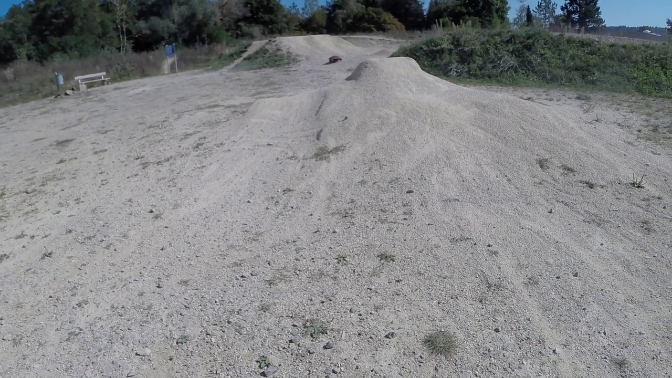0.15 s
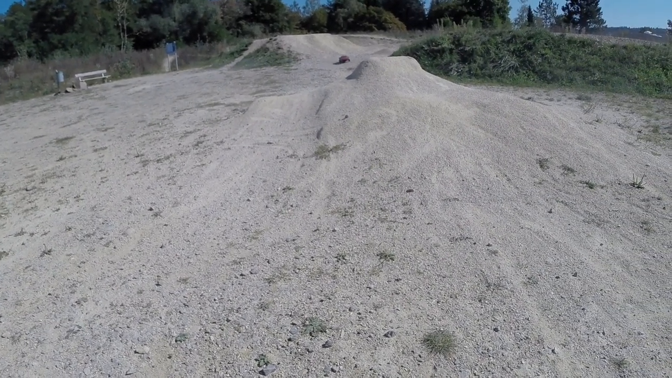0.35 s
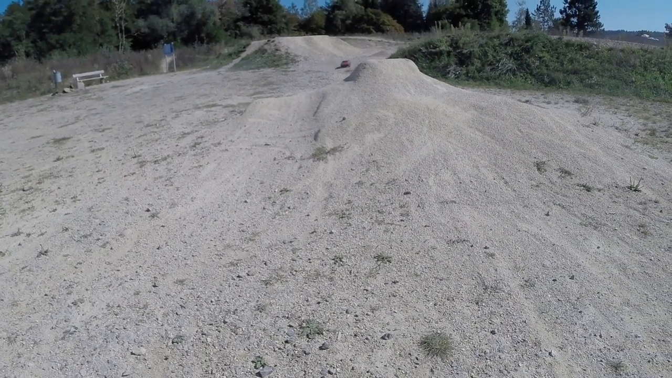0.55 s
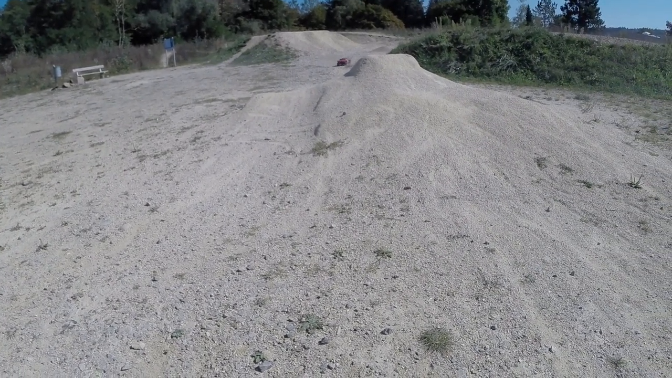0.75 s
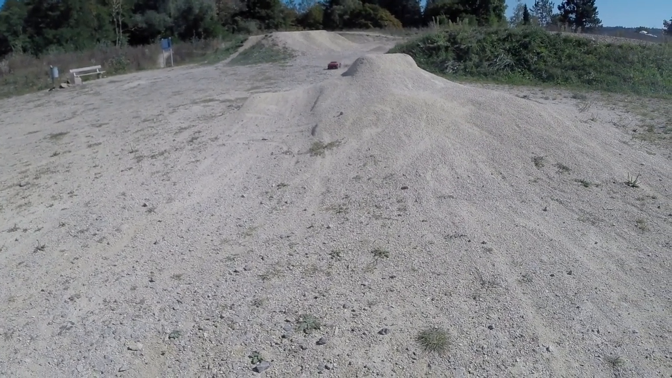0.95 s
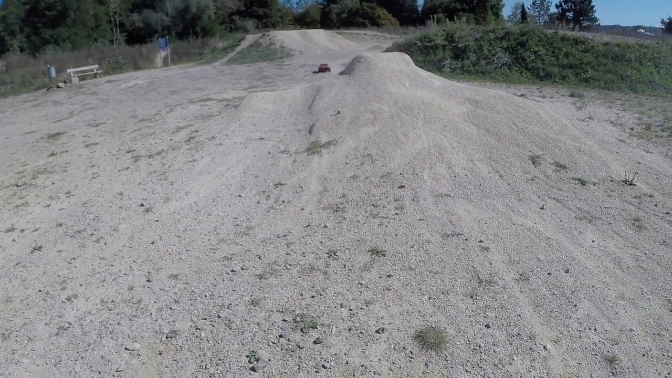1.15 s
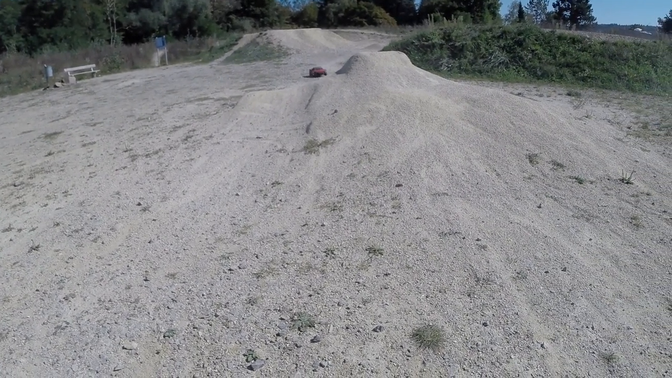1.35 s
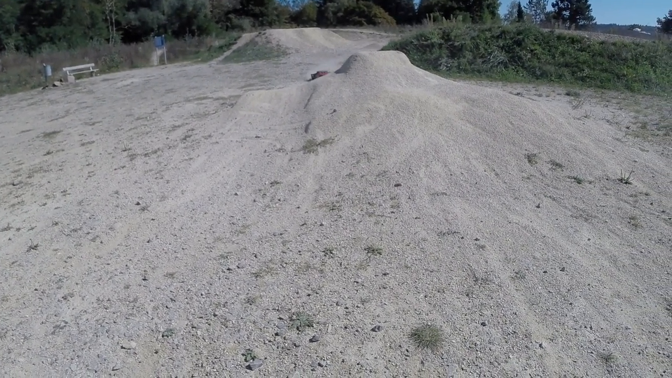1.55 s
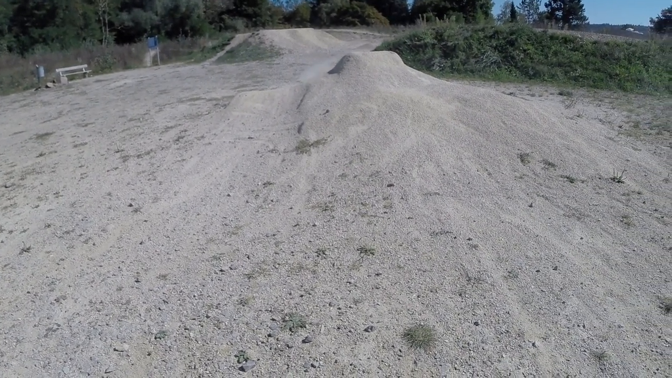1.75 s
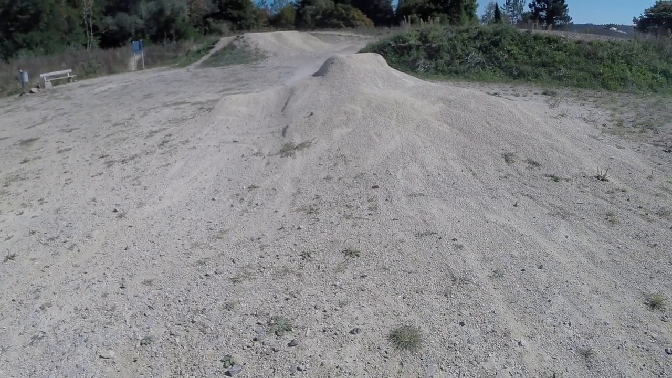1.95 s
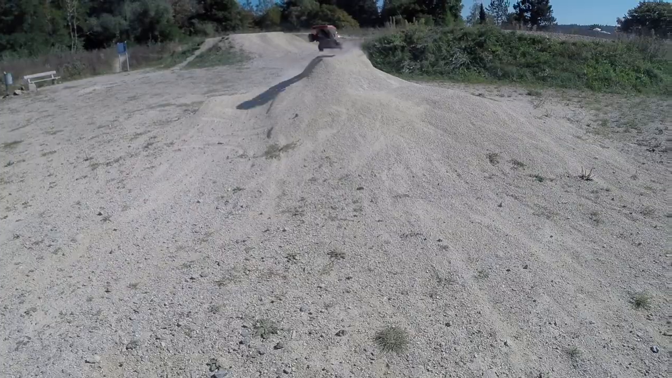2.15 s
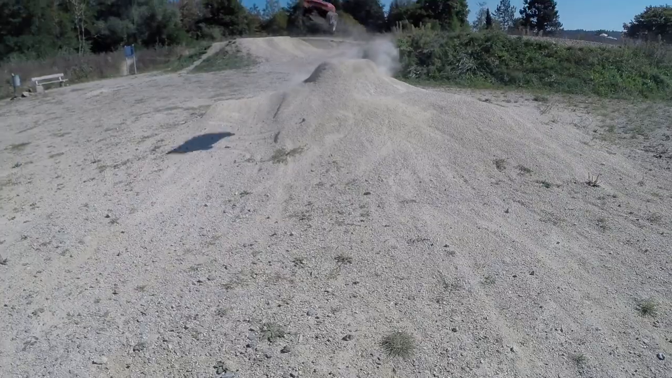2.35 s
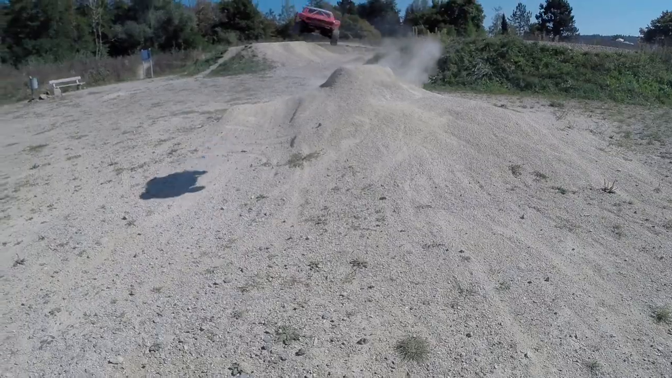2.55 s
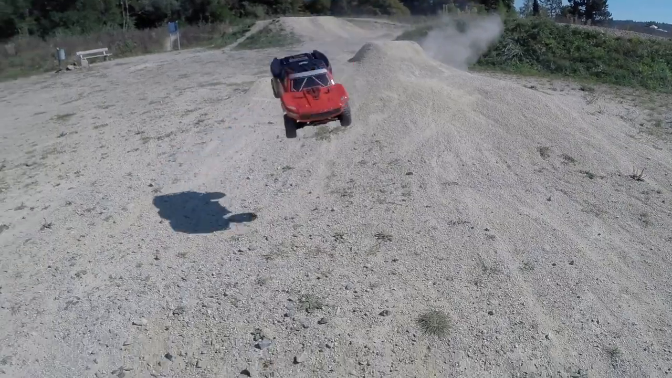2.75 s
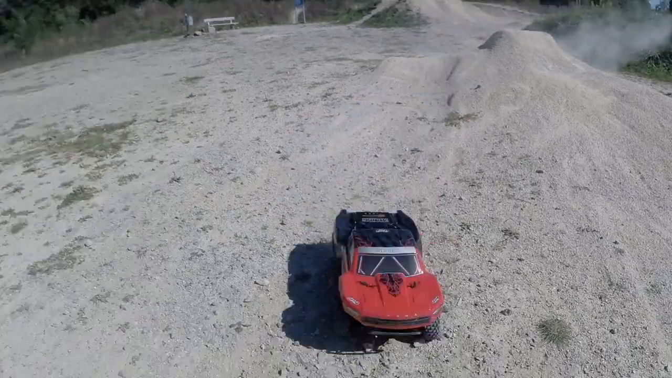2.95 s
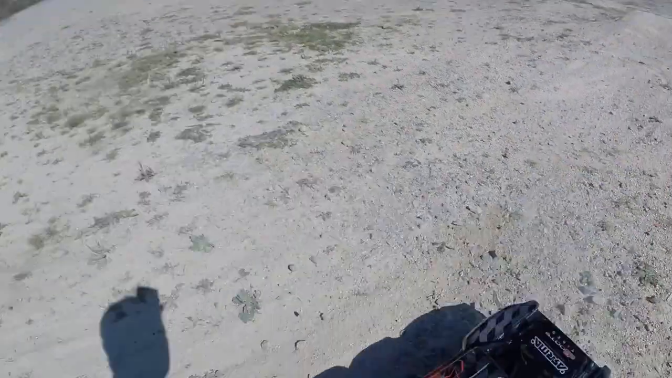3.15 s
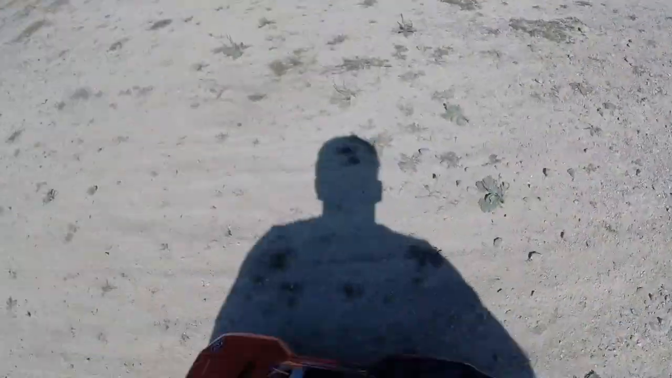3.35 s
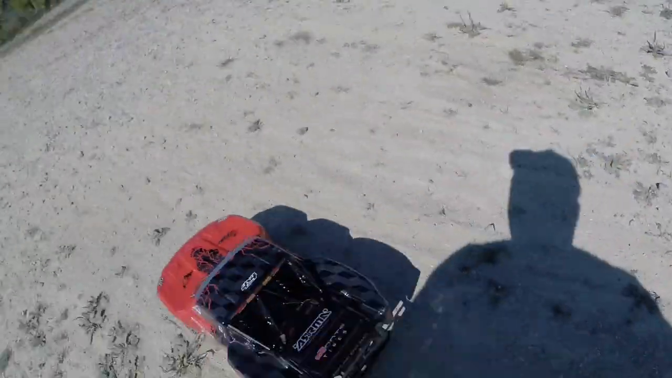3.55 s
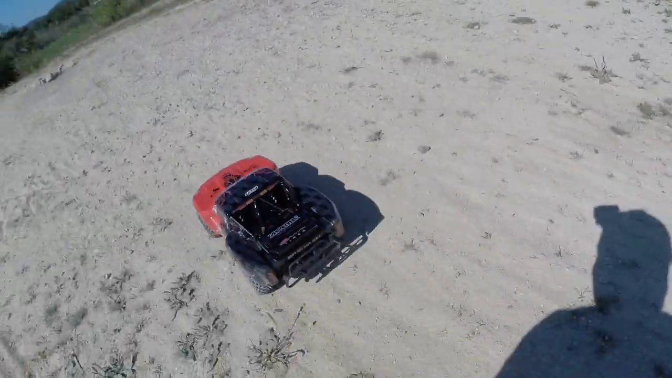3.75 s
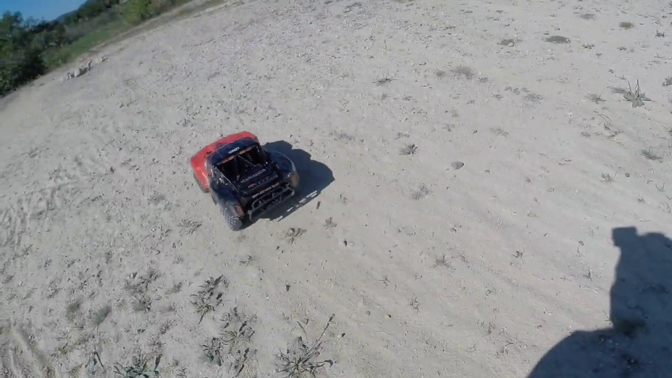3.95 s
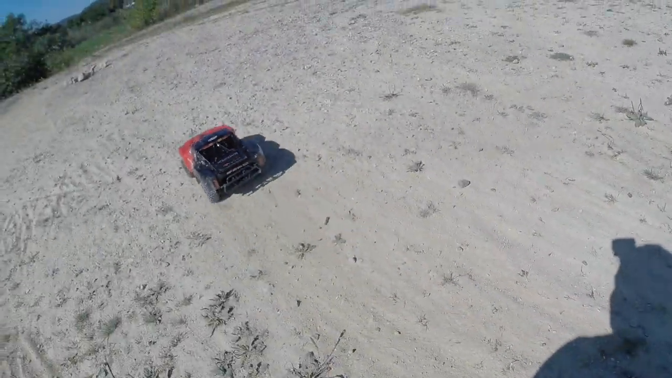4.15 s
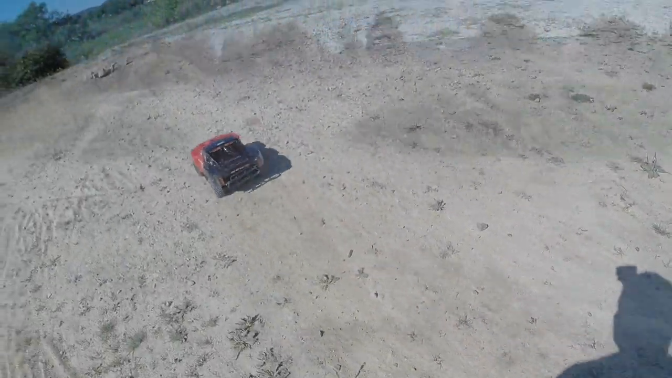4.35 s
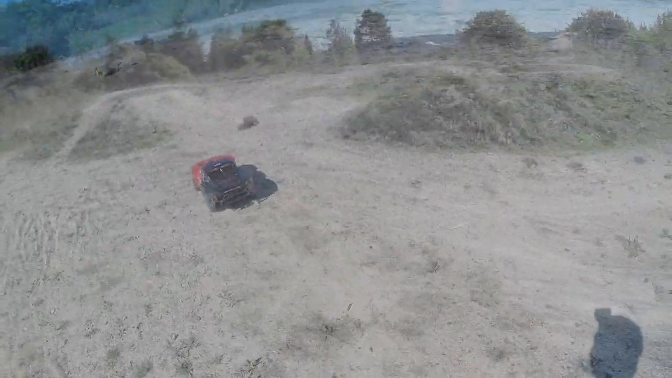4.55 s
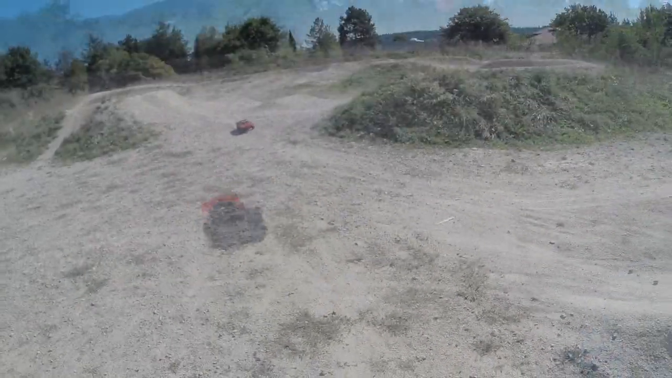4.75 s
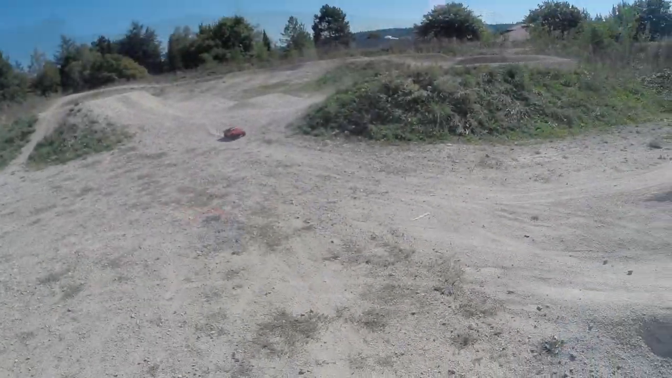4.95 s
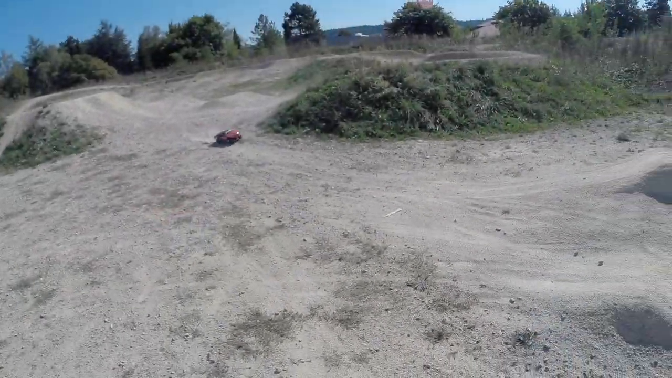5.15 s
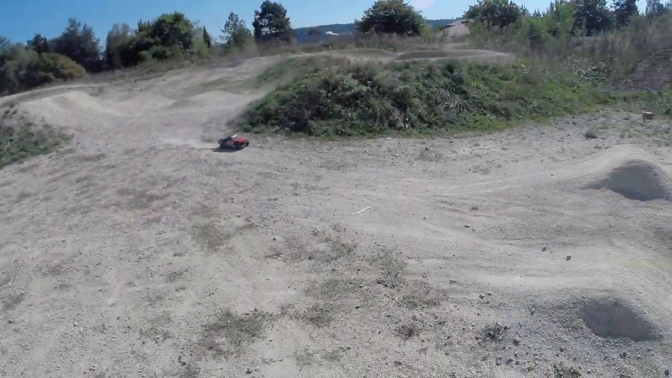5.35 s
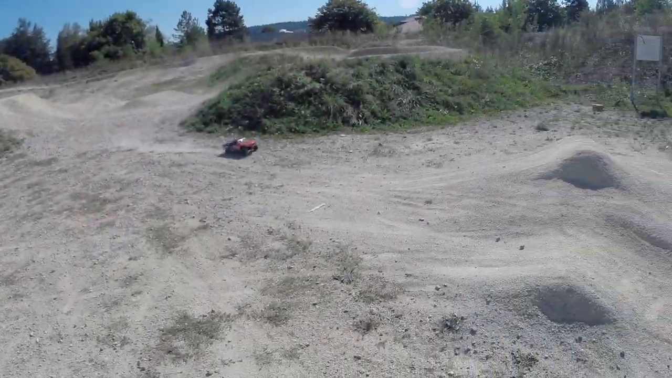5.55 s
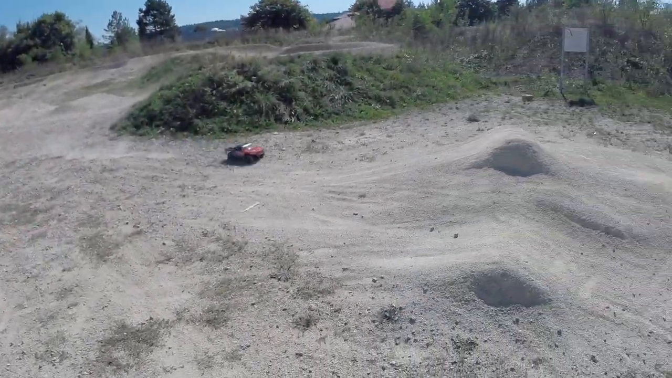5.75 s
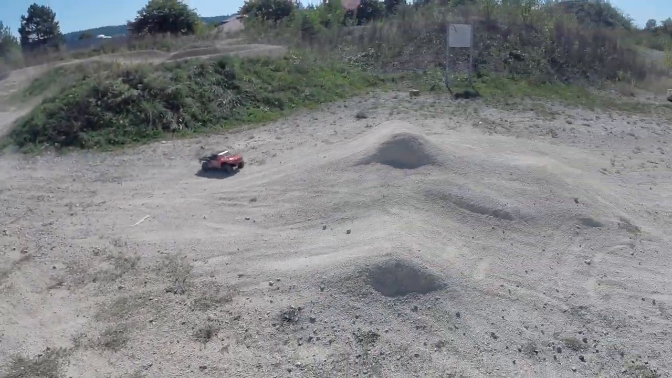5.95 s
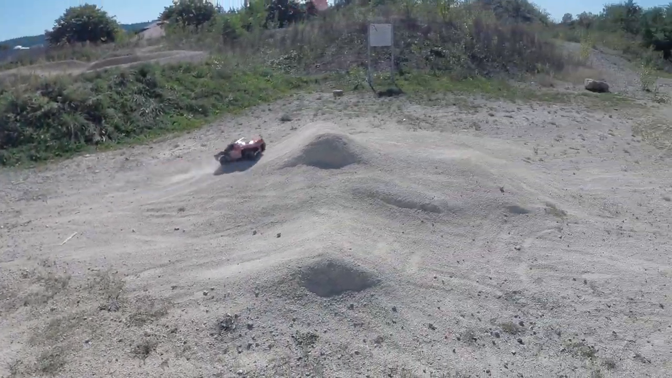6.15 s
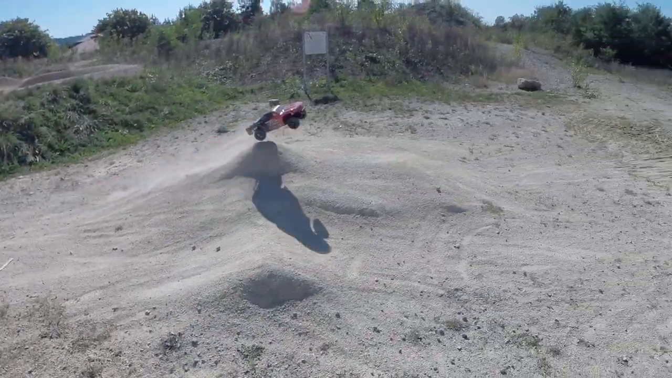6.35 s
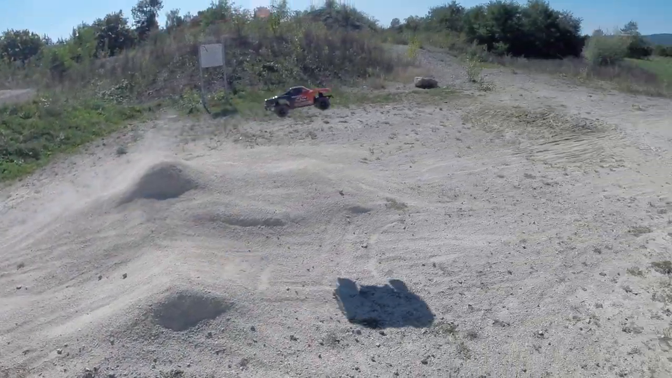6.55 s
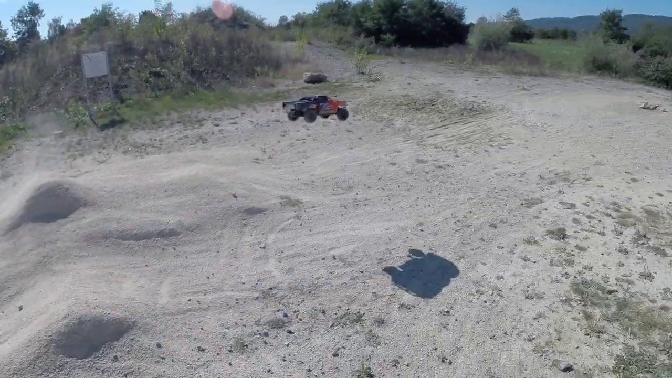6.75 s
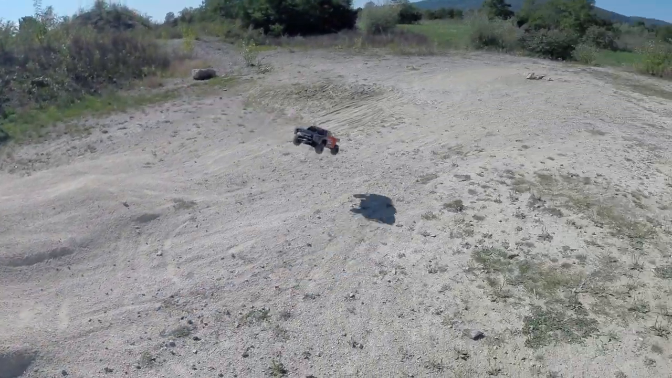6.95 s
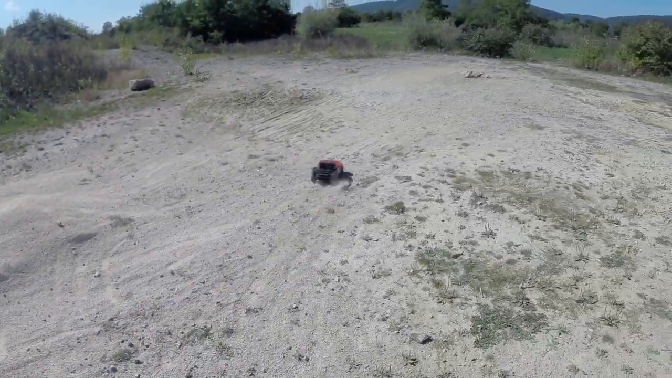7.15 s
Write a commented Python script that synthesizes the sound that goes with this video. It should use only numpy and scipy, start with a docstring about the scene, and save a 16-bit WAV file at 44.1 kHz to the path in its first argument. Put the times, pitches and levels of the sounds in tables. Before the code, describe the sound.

Faint motor whine grows over loose stones, surges in flight, slams down with a plastic clatter, then ticking roll-out, another run and jump.

```python
"""On an open-air gravel track, a small electric radio-controlled truck races, jumps, crashes down,
rolls out ticking, speeds off and jumps again, over a steady hush and wind rumbling on the microphone.
Noise makes the air and the rubber; random contacts ring shell, gearbox and stones as rasp, spray and knocks.
Sines at the gear mesh rate and its fractions whine and buzz with the motor, and sing out in the air."""
import sys
import numpy as np
from scipy import signal
from scipy.fft import rfft, irfft, next_fast_len
from scipy.io import wavfile

SR = 44100
rng = np.random.default_rng(int(sys.argv[2]) if len(sys.argv) > 2 else 0)


def wav_record(signal):
    """Record a signal, one row per channel, as 16-bit PCM in the file named by sys.argv[1]."""
    frames = np.transpose(np.atleast_2d(signal))
    bounded = np.clip(frames, -1, 1)
    # unit amplitude maps onto the largest positive 16-bit level
    quanta = np.round(bounded * 32767).astype(np.int16)
    wavfile.write(sys.argv[1], SR, quanta)


N = 317961
TIME = np.arange(N) / SR  # [s]

# resonances of the plastic shell and chassis: (frequency [Hz], width [Hz], level [dB])
SHELL = [(260, 220, -12), (359, 55, 2.5), (468, 89, 0), (624, 170, -8), (740, 82, -0.5), (910, 105, 3),
         (1146, 105, 4), (1344, 120, 5.5), (1405, 49, 0), (1870, 125, 2), (2317, 95, 10), (2486, 77, 1.5),
         (2660, 136, 4.5), (2933, 100, 10), (3145, 110, -2), (3220, 63, 4), (3760, 170, 1), (4370, 56.5, 8),
         (4460, 39, -26), (5500, 75, -35), (5900, 92, -34), (7160, 170, -33), (9400, 550, -24),
         (11800, 5100, -13.5)]
# resonances of the gearbox and its cover: (frequency [Hz], width [Hz], level [dB])
GEARBOX = [(1487, 71, -4), (1942, 46.5, -2.5), (2290, 79, -6.5), (2510, 104, 1.5), (2780, 99, -2),
           (2892, 250, 3), (3117, 310, 0), (3800, 31, -10), (4420, 73, -13), (4350, 50, 0), (5130, 57, -31)]
# resonances of ringing gravel and the motor can: (frequency [Hz], width [Hz], level [dB])
STONES = [(3000, 850, -13), (3870, 420, 0.5), (4550, 89, 1.5), (5645, 420, -2.5), (6420, 230, -9),
          (7100, 300, -9.5), (8430, 370, -17), (10100, 760, -17), (12700, 1400, -15)]


def from_db(db):
    """Decibels to gain."""
    return 10 ** (np.asarray(db) / 20)


def rms_one(x):
    """Scale to unit power."""
    return x / np.sqrt(np.mean(x ** 2) + 1e-20)


def in_time(rows):
    """Each column of a time curve, interpolated at every sample."""
    s, *columns = np.transpose(rows)
    return [np.interp(TIME, s, column) for column in columns]


def during(start, end, blend_s=0.062):
    """Rises to 1 around the start and falls back to 0 around the end."""
    return np.clip(np.minimum(TIME - start, end - TIME) / blend_s + .5, 0, 1)


def drift(corner_hz):
    """Smooth random wandering with unit spread: low-passed noise drawn at a slow rate."""
    step = 40  # samples between slow values
    r = np.exp(-2 * np.pi * corner_hz * step / SR)
    draws = rng.standard_normal(N // step + 2002)
    slow = signal.lfilter([1], [1, -2 * r, r * r], draws)[2000:]  # skip the filter's start
    return np.interp(np.arange(N) / step, np.arange(len(slow)), rms_one(slow))


def cut(x, hz, kind, order=2):
    """Butterworth low-pass or high-pass."""
    sos = signal.butter(order, min(hz, SR / 2 - 1), kind, fs=SR, output="sos")
    return signal.sosfilt(sos, x + 1e-18)


def noise(spectrum):
    """Unit-power noise coloured by a (frequency [Hz], density [dB]) curve."""
    hz, db = np.transpose(spectrum)
    size = next_fast_len(N)
    bins = np.maximum(np.fft.rfftfreq(size, 1 / SR), 1)
    gain = from_db(np.interp(np.log(bins), np.log(hz), db))
    return rms_one(irfft(rfft(rng.standard_normal(size)) * gain, size)[:N])


def resonate(x, modes):
    """Parallel resonances with notches between them; white noise keeps its power."""
    out, power = 0, 0
    for hz, width, db in modes:
        r = np.exp(-np.pi * width / SR)
        top = from_db(db) * (1 - r * r) / 2
        poles = [1, -2 * r * np.cos(2 * np.pi * hz / SR), r * r]
        out = out + signal.lfilter([top, 0, -top], poles, x + 1e-18)
        power += from_db(db) ** 2 * (1 - r)
    return out / np.sqrt(power)


def chatter():
    """Dense, even make-and-break of a hard contact: random signs."""
    return rng.choice([-1., 1.], N)


def grains(per_s, spread_db):
    """Random tiny impacts, many weak and a few strong; unit power."""
    sizes = from_db(spread_db * np.minimum(rng.exponential(1, N), 4))
    hits = rng.random(N) < per_s / SR
    return rms_one(sizes * rng.choice([-1, 1], N) * hits)


def blows(times, levels_db, t60s):
    """Force envelope that jumps at each blow and dies away, 60 dB in t60; overlaps add in power."""
    out = np.zeros(N)
    for s, db, t60 in zip(times, levels_db, t60s):
        start = int(np.clip(s * SR, 0, N - 1))
        age = TIME[:min(SR // 4, N - start)]  # at most a quarter second
        out[start:start + len(age)] += from_db(db - 60 * age / t60) ** 2
    return np.sqrt(out)


def scattered(per_s, level_db, spread_db, t60):
    """Force envelope of small blows of uneven size at random moments."""
    uneven_db = spread_db * np.clip(rng.standard_normal(N), -2, 2)
    sizes = from_db(level_db + uneven_db) * (rng.random(N) < per_s / SR)
    keep = from_db(-60 / (t60 * SR)) ** 2  # power kept per sample
    return np.sqrt(signal.lfilter([1], [1, -keep], sizes ** 2 + 1e-18))


def outdoors(sway_db=0.73):
    """Steady open-air hush that sways slightly, with wind lumping and rumbling on the microphone."""
    # spectra of the hush, deep gust lumps and rumble: (frequency [Hz], density [dB per Hz])
    air_colour = [(65, -30), (110, 1.5), (205, -2), (257, -4.5), (458, -8), (612, -9), (946, -13),
                  (1190, -16), (1760, -18), (2350, -23), (2660, -19), (3860, -26.5), (4950, -25),
                  (5840, -28), (8400, -32.5), (9400, -34), (10050, -30), (10800, -37), (15400, -34)]
    gust_colour = [(8, -6.5), (16, 11), (26, -2), (40, 5), (55, -26), (100, -16), (200, -80)]
    rumble_colour = [(30, -40), (48, -7), (68, 0.5), (85, -8), (110, -17), (170, -22), (400, -75)]
    # wind on the microphone: (time [s], deep lump level [dB], rumble level [dB])
    wind = [(0, -52.5, -55), (2.2, -52.5, -52), (2.35, -43.5, -50), (2.7, -54.5, -49.5), (2.9, -30, -48.5),
            (3.4, -36, -52), (4.15, -42.5, -49.5), (4.8, -51, -54), (5.9, -51, -51), (6.35, -47.5, -54),
            (6.7, -48.5, -46.5), (7.21, -49.5, -49)]
    lumps_db, rumble_db = in_time(wind)
    air = from_db(-54.5 + sway_db * drift(15)) * noise(air_colour)
    return air + from_db(lumps_db) * noise(gust_colour) + from_db(rumble_db) * noise(rumble_colour)


def tyres(bump_db=2, rubber_db=-0.5, shell_db=-6, shell_top_hz=1400):
    """Rubber drums over the bumpy packed dirt and shakes the shell."""
    # common level of rubber and shaken shell: (time [s], level [dB])
    rolling = [(0, -62), (2.4, -60.5), (2.62, -62), (2.94, -50.5), (3.1, -47), (3.45, -53.5), (4.1, -58.5),
               (4.55, -74), (5.1, -60), (6.2, -53.5), (6.5, -60)]
    # drumming rubber: (frequency [Hz], density [dB per Hz])
    tyre_colour = [(100, -34), (200, 3), (340, 3), (560, -3), (800, -7), (1000, -5.5), (1200, -4.5),
                   (1480, -5.5), (1700, -7), (2600, -10), (6000, -58)]
    rubber = noise(tyre_colour)
    shaken = rms_one(cut(resonate(chatter(), SHELL), shell_top_hz, "low", order=4))
    level = from_db(in_time(rolling)[0] + bump_db * drift(23))
    return level * (from_db(rubber_db) * rubber + from_db(shell_db) * shaken)


def gravel(level_db, clump_db=3.0, top_hz=11000):
    """Tyres throw clumps of small stones that click against each other and ring."""
    stones = grains(per_s=3500, spread_db=0.5) * from_db(clump_db * drift(54))
    return from_db(level_db) * rms_one(cut(resonate(stones, STONES), top_hz, "low"))


def pebbles(per_s, level_db, t60=0.0072, low_hz=2800, top_hz=7500, spread_db=3):
    """Single pebbles patter down, each a very short bright click of its own size."""
    force = scattered(per_s, level_db, spread_db, t60)
    return cut(cut(chatter() * force, low_hz, "high"), top_hz, "low", order=3)


def grinding(clump_db=4, low_hz=1500, top_hz=5000, crunch_db=-3, crunch_top_hz=4500):
    """Coarse stones under slow wheels shift and ring in uneven clumps, with a dry crunch of smaller ones."""
    # grinding under the wheels: (time [s], level [dB])
    grind_level = [(3.05, -87), (3.12, -57), (3.5, -61), (3.64, -54), (3.78, -52.5), (3.93, -49.5),
                   (3.99, -53), (4.06, -56.5), (4.35, -63.5), (4.55, -69), (4.7, -90)]
    # ringing coarse stones: (frequency [Hz], width [Hz], level [dB])
    coarse_modes = [(2474, 58, 8.5), (3100, 290, -4), (3700, 250, -16), (4430, 160, -13)]
    clumps = from_db(clump_db * np.clip(drift(70), -2, 1.5))
    stones = resonate(grains(per_s=3000, spread_db=4.5) * clumps, coarse_modes)
    crunch = cut(grains(per_s=900, spread_db=2.5) * clumps, crunch_top_hz, "low", order=4)
    mixed = cut(cut(stones + from_db(crunch_db) * crunch, low_hz, "high"), top_hz, "low")
    return from_db(in_time(grind_level)[0]) * rms_one(mixed)


def clicks(t60=0.015):
    """Brief hard contacts with a thin, bright ring."""
    # two small hard contacts: (time [s], force [dB])
    click_hits = [(0.2145, -43), (0.32, -50)]
    # their ring: (frequency [Hz], width [Hz], level [dB])
    click_modes = [(4650, 120, -4), (5200, 150, 3), (5570, 130, 0), (6520, 170, 6), (7150, 170, -15)]
    s, db = np.transpose(click_hits)
    return resonate(chatter() * blows(s, db, np.full(len(s), t60)), click_modes)


def loose_shell(per_s, level_db, t60=0.0094, low_hz=1650, top_hz=3600, spread_db=5.0):
    """The loose shell taps lightly and unevenly on its posts and rings."""
    force = scattered(per_s, level_db, spread_db, t60)
    return cut(cut(resonate(chatter() * force, SHELL), low_hz, "high", order=4), top_hz, "low")


def wheel_knocks(t60=0.034, crack_db=2, crack_t60=0.016, low_hz=1300, top_hz=4800,
                 grit_db=-17, grit_t60=0.069, grit_hz=6000, grit_top_hz=9800):
    """Each turn of the slowing wheels cracks, rings the suspension and flicks up a spray of fine grit."""
    # one knock per wheel turn in the roll-out: (time [s], force on the suspension [dB])
    turn_hits = [(3.372, -32.5), (3.4107, -35), (3.4485, -36), (3.4875, -34.5), (3.5285, -40), (3.568, -38),
                 (3.6097, -37.5), (3.655, -41.5), (3.745, -43), (3.79, -44), (3.837, -40.5), (3.8886, -50),
                 (3.942, -45), (3.9965, -42.5), (4.038, -48), (4.102, -44), (4.306, -48), (4.379, -50)]
    # ringing wheels and suspension: (frequency [Hz], width [Hz], level [dB])
    suspension = [(1474, 57, 4), (2650, 140, 3), (3280, 88, 2), (3870, 75, -0.5), (4140, 65, -14),
                  (4500, 52, -26)]
    s, db = np.transpose(turn_hits)
    ring = resonate(chatter() * blows(s, db, np.full(len(s), t60)), suspension)
    crack_force = blows(s, db + crack_db, np.full(len(s), crack_t60))
    crack = rms_one(cut(chatter(), low_hz, "high")) * crack_force
    grit = grains(per_s=2000, spread_db=1.0) * blows(s, db + grit_db, np.full(len(s), grit_t60))
    spray = cut(cut(grit, grit_hz, "high"), grit_top_hz, "low", order=6)
    return spray + cut(ring + crack, top_hz, "low", order=3)


def knocks(body_hz=1900, t60=0.027, body_db=-1, clack_db=4, tick_db=-3, clack_hz=1400,
           clack_low_hz=700, bottom_hz=1100, tick_hz=4800, top_hz=4600, box_db=-5):
    """Each knock swells into flexing shell and gearbox, clacks hollowly and adds its bright tick."""
    # knocks on the shell, mostly stones; at 2.419 s the suspension tops out in the air, at 3.696 s a slowing
    # wheel knocks; before the part trims: (time [s], force [dB], low clack relative to it [dB], bright tick
    # relative to it [dB])
    shell_hits = [(1.757, -45, -2, 1), (2.419, -39.5, 6, 5), (2.627, -33.5, -18, -3.5),
                  (2.7612, -45, -21, 7), (2.863, -37, 1, -26), (3.1138, -39.5, -20, 9.5),
                  (3.14, -44, -20, 10), (3.186, -40, -12, 4), (3.199, -45, -15, 8), (3.23, -41, -15, 5.5),
                  (3.237, -32.5, -0.5, -13), (3.298, -40, -18, 3), (3.424, -52, -20, 9),
                  (3.696, -30, -12, -2), (3.917, -38.5, -11, -25), (4.17, -38, -10, -20),
                  (5.219, -39.5, -17, -1), (5.23, -37.5, -16, 2), (5.273, -39, -15, -13),
                  (5.592, -40, -27, 5), (5.9416, -35.5, -1, -2), (5.978, -44.5, -14, 12.5),
                  (6.1669, -32.5, -16, 0.5), (6.18, -33.5, -6, 4), (6.2722, -25.5, -16, -26),
                  (6.333, -49, -24, 17.5)]
    s, db, low_db, bright_db = np.transpose(shell_hits)
    decay = np.full(len(s), t60)
    give = np.exp(-1 / (.0012 * SR))  # the flexing shell softens the attack over 1.2 ms
    force = signal.lfilter([1 - give], [1, -give], blows(s, db + body_db, decay) + 1e-18)
    body = cut(chatter() * force, body_hz, "high", order=3)
    shell = resonate(body, SHELL) + from_db(box_db) * resonate(chatter() * force, GEARBOX)
    shell = cut(cut(shell, bottom_hz, "high"), top_hz, "low")
    clack = cut(chatter() * blows(s, db + low_db + clack_db, decay), clack_hz, "low", order=3)
    hollow = cut(resonate(clack, SHELL), clack_low_hz, "high", order=3)
    tick = resonate(chatter() * blows(s, db + bright_db + tick_db, decay), STONES)
    return hollow + shell + cut(cut(tick, tick_hz, "high"), 6700, "low")


def thumps():
    """The tyres bottom out and ring briefly as hollow, decaying sines."""
    # (time [s], frequency [Hz], peak [dB], t60 [s])
    hollow_hits = [(3.02, 342.5, -28, 0.21), (7.188, 410, -33, 0.098)]
    return sum(blows([s], [db], [t60]) * np.sin(2 * np.pi * hz * (TIME - s))
               for s, hz, db, t60 in hollow_hits)


def landings(thud_hz=1000, top_hz=6500, bottom_hz=190, grit_db=-32, grit_hz=6000):
    """Wheels, skid plate and loose shell hit one after another, each a short rattle that crushes grit."""
    # chassis and shell slamming down: (time [s], force [dB], rattle t60 [s], thud relative to force [dB])
    slams = [(2.949, -39, 0.25, 8), (2.961, -22.5, 0.042, -4), (2.970, -24.5, 0.23, 6),
             (2.988, -22.5, 0.13, 3), (3.009, -20.5, 0.099, -5), (3.014, -24, 0.084, 5.5),
             (3.021, -18.5, 0.06, 9.5), (3.033, -24, 0.12, 8.5), (3.065, -32, 0.14, 2.5),
             (7.17, -37, 0.095, 3), (7.182, -27, 0.081, -3), (7.198, -36, 0.17, 4.5)]
    s, db, t60, thud_db = np.transpose(slams)
    force = blows(s, db, t60)
    slap = cut(chatter() * force, thud_hz, "high")
    thud = cut(chatter() * blows(s, db + thud_db, t60), thud_hz, "low")
    grit = cut(cut(chatter() * force, grit_hz, "high"), 11000, "low")
    crash = cut(cut(resonate(slap + thud, SHELL), top_hz, "low"), bottom_hz, "high")
    return crash + from_db(grit_db) * grit


def squeals(wander=0.044):
    """Each rough squeal swells and fades as it slides down in wavering pitch."""
    # (time [s], length [s], start pitch [Hz], end pitch [Hz], level [dB])
    slides = [(2.25, 0.14, 2880, 2690, -49.5), (3.285, 0.078, 2690, 2285, -47),
              (6.44, 0.13, 2990, 2350, -50.5)]
    out = 0
    for s, length, from_hz, to_hz, db in slides:
        part = np.clip((TIME - s) / length, 0, 1)
        hz = (from_hz + (to_hz - from_hz) * part) * (1 + wander * drift(109.4))
        swell = np.sqrt(2 * np.abs(np.sin(np.pi * part)))
        tone = np.sin(2 * np.pi * np.cumsum(hz) / SR)
        out = out + from_db(db) * swell * drift(84) * tone  # the drift roughens it
    return out


def shudders(low_hz=1800, top_hz=4200):
    """Spinning or snatching wheels shake the drivetrain in short swelling bursts of gear chatter."""
    # (time [s], length [s], peak force [dB])
    surges = [(2.217, .028, -39), (2.318, .03, -50), (2.396, .04, -42.5), (2.472, .024, -39.5),
              (2.508, .015, -33), (4.707, 0.046, -56), (4.79, .05, -52.5)]
    # ringing drivetrain: (frequency [Hz], width [Hz], level [dB])
    shudder_modes = [(2410, 110, 2), (2760, 120, 4), (3000, 120, 9), (3250, 88, -13)]
    force = sum(from_db(db) * np.sin(np.pi * np.clip((TIME - s) / length, 0, 1))
                for s, length, db in surges)
    return cut(cut(resonate(chatter() * force, shudder_modes), low_hz, "high"), top_hz, "low")


def gear_rasp(level_db, flutter_db=2.0, top_hz=6000, bottom_hz=1200):
    """Gritty teeth rattle the gearbox, unevenly as the wheels shake."""
    teeth = grains(per_s=5600, spread_db=2.0) * from_db(flutter_db * drift(43))
    box = cut(cut(resonate(teeth, GEARBOX), top_hz, "low"), bottom_hz, "high")
    return from_db(level_db) * rms_one(box)


def motion():
    """Gear mesh rate [Hz] and how far the truck is airborne, coasting and gripping under throttle (0-1)."""
    # motor speed with the tyres gripping: (time [s], gear mesh rate [Hz])
    cruise = [(0, 3006), (.6, 2980), (1.45, 4057), (2.23, 4212), (4.92, 4373), (4.99, 4708), (5.02, 3910),
              (5.3, 4160), (6.05, 4303), (6.19, 3956), (6.42, 3865)]
    # bumps lift the wheels and the motor revs in a short arch:
    # (time [s], length [s], rise [Hz], grip lost [0-1])
    hops = [(-.02, .53, 0, .45), (-.02, .06, 120, .17), (0.075, .055, 190, .25), (0.16, .055, 180, 0.38),
            (0.215, .035, 110, .3), (0.26, .04, 330, .35), (0.315, .035, 400, .25), (.355, .025, 200, .17),
            (.39, .04, 200, .15), (1.819, .13, 380, .3), (4.915, .065, 100, 0.65), (5.02, 1.08, 0, .55),
            (5.275, .055, 370, .2), (5.335, .055, 260, .17), (5.56, .11, 310, .24), (5.712, .155, 650, .33),
            (5.905, .055, 200, .33), (5.97, .11, 330, .17), (6.31, 0.09, 10, 1)]
    # (wheels break loose [s], whine rings free [s], throttle off [s], landing [s], throttle on again [s])
    jumps = [(2.23, 2.335, 2.42, 2.96, 4.67), (6.412, 6.45, 6.735, 7.18, 7.5)]
    # airborne, the motor spins up towards its free speed; off the throttle it coasts down to a slow roll
    free_hz, slow_roll_hz = 5450, 2050
    spin_up_s, coast_s = .115, 1.22  # time constants
    grip_lag_s, grip_blend_s = .015, .02
    hz, = in_time(cruise)
    airborne, coasting, grip = 0, 0, 1
    for s, length, rise_hz, lost in hops:
        hz = hz + rise_hz * np.sin(np.pi * np.clip((TIME - s) / length, 0, 1))
        grip = grip - lost * during(s + grip_lag_s, s + length + grip_lag_s, grip_blend_s)
    for loose, ringing, release, landing, resume in jumps:
        spun_s = np.clip(TIME, loose, release) - loose
        idle_s = np.maximum(TIME - release, 0)
        free = free_hz - (free_hz - np.interp(loose, TIME, hz)) * np.exp(-spun_s / spin_up_s)
        free = np.maximum(free * np.exp(-idle_s / coast_s), slow_roll_hz)
        hz = hz + during(loose, resume) * (free - hz)
        grip = grip - during(ringing, resume)
        airborne = airborne + during(ringing, landing)
        coasting = coasting + during(release, resume)
    return hz, airborne, coasting, np.clip(grip, 0, 1)


def motor(hz, grip, airborne, coasting, drive_db, spray_db, shaft_db=-4, fall_db=2.5, swell_db=-2.5):
    """The mesh whines with motor speed, freed by lost grip; shaft harmonics buzz gearbox and motor can."""
    # how well the gearbox radiates the mesh: (frequency [Hz], level relative to the drivetrain [dB])
    whine_colour = [(2100, -36), (2500, -2), (2750, 0), (3020, 12), (3250, 7), (3450, 4), (3650, -7),
                    (3950, -2), (4400, -.5), (4950, -1)]
    # mesh whine in flight, coming and going: (time [s], level [dB])
    flight_whine = [(2.355, -68), (2.375, -55), (2.395, -53), (2.412, -68), (2.47, -66), (2.5, -61),
                    (2.535, -47), (2.585, -51), (2.635, -41.5), (2.675, -49), (2.70, -56), (2.725, -54),
                    (2.76, -48), (2.78, -58), (2.9, -70), (6.44, -66), (6.48, -48), (6.57, -56),
                    (6.63, -48), (6.68, -61), (6.73, -52.5), (6.79, -55), (6.88, -60), (6.92, -44.5),
                    (6.98, -54), (7.02, -56), (7.08, -59), (7.13, -62)]
    # shaft tones in the gearbox: (multiple of the mesh rate, level before balancing [dB])
    shaft_tones = [(.5, -8), (.75, -2)]
    # unloaded shaft near free speed: (multiple of the mesh rate, level relative to the drivetrain [dB])
    free_tones = [(.264, -10.5), (.625, -9), (.742, -10.5)]
    # thin upper resonances of the motor can: (frequency [Hz], width [Hz], level [dB])
    can_treble = [(8450, 330, 2), (9200, 250, -5), (10600, 350, -8), (11300, 300, -4), (11960, 400, -4)]
    grip_damps_db, coast_quiets_db = 23, 6  # on the whine, and on the singing can
    buzz_db, singing_db, can_treble_db = -9.5, -2, -21  # relative to drivetrain, spray, singing
    pinion_teeth = 12

    colour_db = np.interp(hz, *np.transpose(whine_colour))
    ground_db = drive_db + colour_db - grip_damps_db * grip + swell_db * drift(5.6)
    whine_db = ground_db + airborne * (in_time(flight_whine)[0] - ground_db)
    # on the ground the wheels grip and slip, so the speed wavers more than in the air
    waver = .003 * drift(140) + (.004 + .002 * (1 - airborne)) * drift(35)
    mesh = 2 * np.pi * np.cumsum(hz * (1 + waver)) / SR  # phase
    flutter = from_db(4.3 * drift(55) - 2.4) * (1 + .33 * drift(400))
    whine = from_db(whine_db) * np.sqrt(2) * flutter * np.sin(mesh)

    # play in the teeth blurs the shaft tones, heard through the gearbox, and on their own at free speed
    play = 2 * np.pi * np.cumsum(hz * .008 * drift(150)) / SR
    shafts = sum(from_db(level) * np.sin(ratio * (mesh + play)) for ratio, level in shaft_tones)
    free = sum(from_db(level + 3 * drift(30)) * np.sin(ratio * (mesh + play / 2))
               for ratio, level in free_tones)
    unloaded = np.interp(hz, [4750, 5200], [0, 1])

    # harmonics of one pinion turn, each wandering in strength
    turn_play = 2 * np.pi * np.cumsum(hz * .014 * drift(110)) / SR
    turn = (mesh + turn_play) / pinion_teeth
    low = sum(np.sin(k * turn) * drift(60) for k in range(6, 11))
    high = sum(np.sin(k * turn) * drift(55) for k in range(15, 21))
    top = sum(np.sin(k * turn) * drift(70) for k in range(22, 35))
    buzz = rms_one(resonate(low, GEARBOX)) + from_db(shaft_db) * rms_one(resonate(shafts, GEARBOX))
    can = rms_one(resonate(high, STONES)) + from_db(can_treble_db) * rms_one(resonate(top, can_treble))
    can_db = spray_db + singing_db - coast_quiets_db * coasting
    singing = from_db(can_db + fall_db * drift(39)) * can
    return whine + from_db(drive_db) * (from_db(buzz_db) * buzz + unloaded * free) + singing


def scene():
    """Taps and pebbles thin out in the air; rattle takes over from rasp as the truck rolls out."""
    # reference levels before the first landing, then from the roll-out to the second jump:
    # (time [s], drivetrain level [dB], gravel spray level [dB])
    approach = [(0.35, -68.5, -77), (1.22, -66.5, -74), (1.48, -60, -66.5), (1.92, -62, -74.5),
                (2.15, -58.5, -61), (2.22, -45, -51.5), (2.33, -48, -56.5), (2.49, -45, -57.5),
                (2.71, -51.5, -57), (2.93, -47, -63)]
    departure = [(3.14, -53, -54.5), (3.34, -47.5, -60.5), (3.62, -53, -62.5), (3.91, -54, -74),
                 (4.68, -62, -100), (4.73, -57, -79), (5.0, -61, -66.5), (5.2, -58.5, -59),
                 (5.88, -55, -58), (6.19, -51, -51), (6.76, -46.5, -57.5), (7.15, -52.5, -62)]
    drive_db, spray_db = in_time(list(approach) + list(departure))
    hz, airborne, coasting, grip = motion()
    rolling_out = coasting * (1 - airborne)
    grip = grip + 0.57 * rolling_out  # the tyres hold only lightly without throttle

    # rolling without throttle: less rasp, more rattle and loose stones
    rasp_db = drive_db - 2.5 * rolling_out
    tap_db = drive_db + 2.5 + 4.5 * rolling_out
    pebble_db = spray_db + 5.5 + 4.5 * rolling_out
    # blows per second on the ground, and the share left in the air
    taps_per_s = 71 * (1 - airborne + 0.43 * airborne)
    pebbles_per_s = 51 * (1 - airborne + .35 * airborne) + 260 * rolling_out

    background = outdoors()
    ground = tyres() + gravel(spray_db - 2) + pebbles(pebbles_per_s, pebble_db) + grinding()
    rattle = clicks() + loose_shell(taps_per_s, tap_db) + wheel_knocks() + knocks()
    impacts = thumps() + landings()
    drivetrain = gear_rasp(rasp_db) + motor(hz, grip, airborne, coasting, drive_db, spray_db)
    drivetrain = drivetrain + shudders() + squeals()
    return (background + ground + rattle + impacts + drivetrain)[None]


def record(dry, mic_top_hz=14000, cutoff_hz=15400):
    """The microphone dulls the highest treble, and the top is cut steeply."""
    dulled = cut(dry, mic_top_hz, "low")
    steep = signal.ellip(10, .2, 80, cutoff_hz, fs=SR, output="sos")  # .2 dB ripple, 80 dB down
    return signal.sosfilt(steep, dulled)


dry = scene()
out = record(dry)
wav_record(out)
```